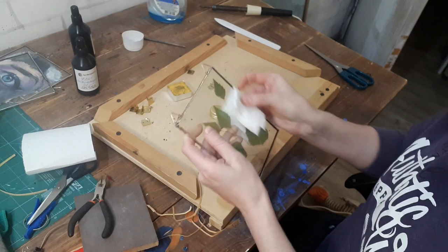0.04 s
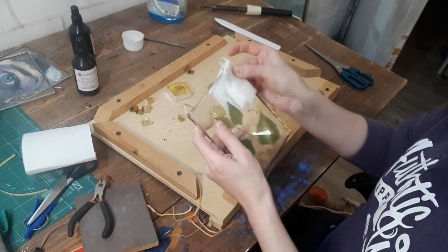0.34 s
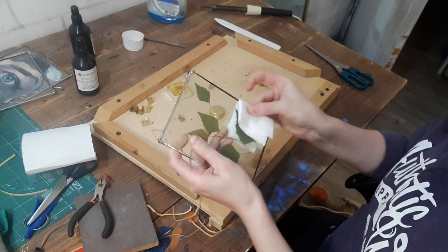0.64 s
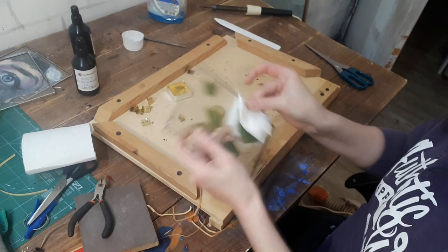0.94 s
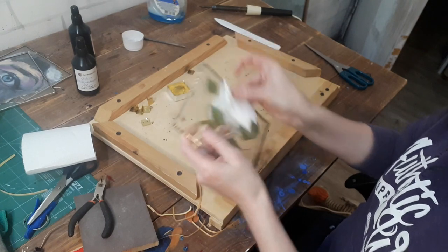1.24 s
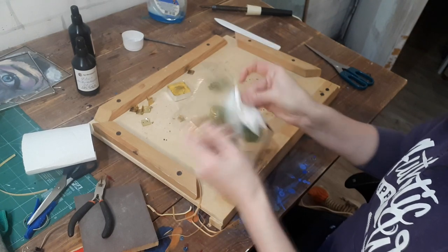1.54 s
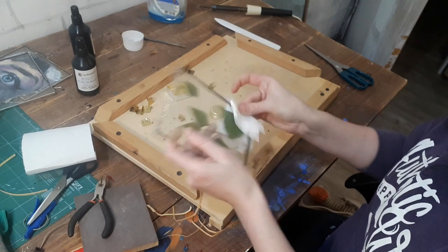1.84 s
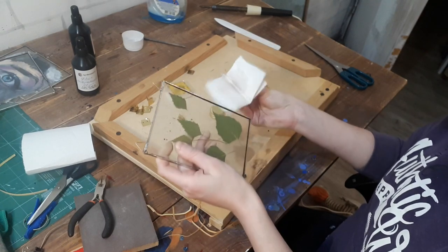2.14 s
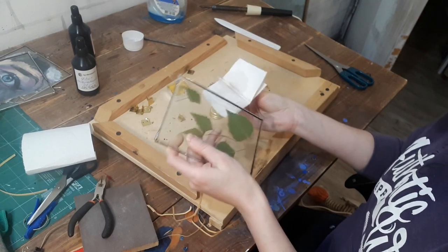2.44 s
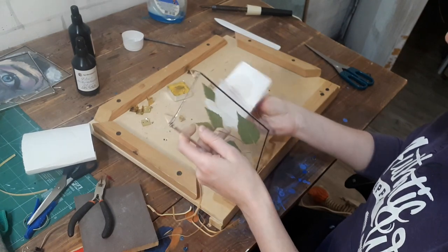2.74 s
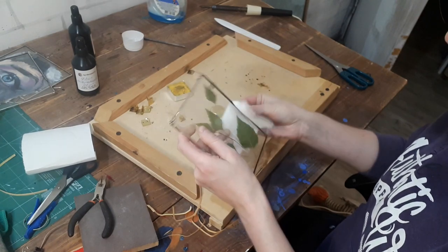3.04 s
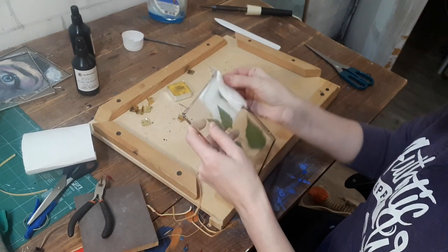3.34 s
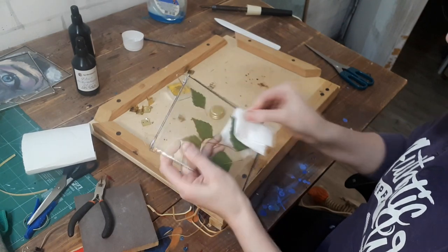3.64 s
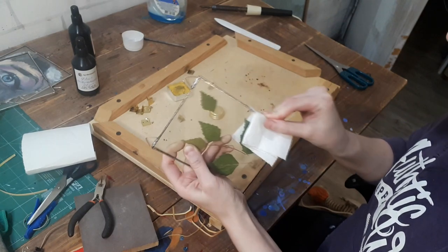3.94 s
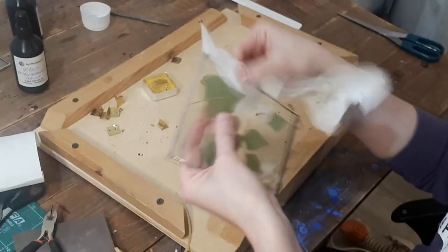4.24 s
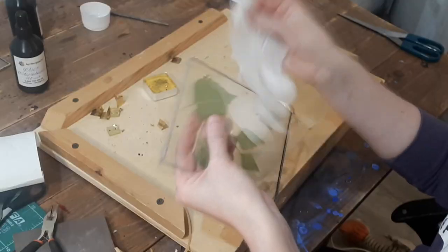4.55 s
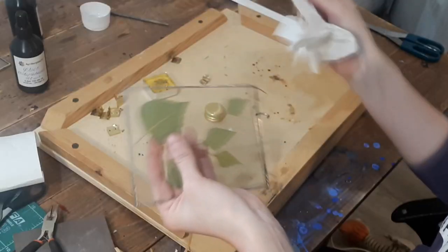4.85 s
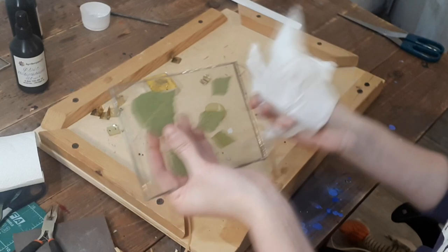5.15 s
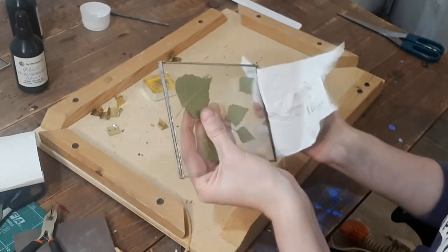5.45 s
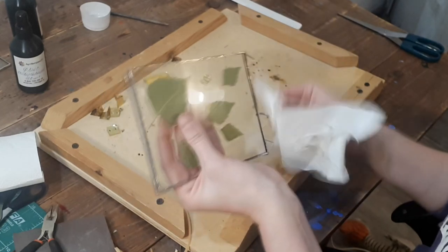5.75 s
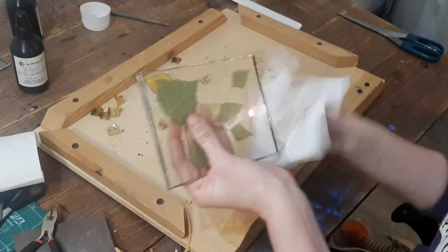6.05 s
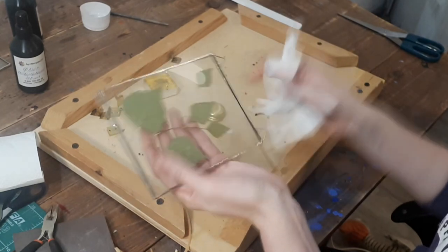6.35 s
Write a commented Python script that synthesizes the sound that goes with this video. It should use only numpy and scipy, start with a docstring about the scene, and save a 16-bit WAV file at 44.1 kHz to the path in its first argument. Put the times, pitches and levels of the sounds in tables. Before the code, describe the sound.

A damp paper napkin wipes glass in quick hissing strokes, then is shaken and refolded, with crisp snaps and light knocks.

```python
"""Wiping glass with a damp napkin

Quick strokes hiss over a hand-held glass panel as the paper's fibres catch and slip. Twice the paper
drags coarsely over the edge, then it is shaken out and refolded. Creases snap, the panel knocks lightly
and there are soft bumps on the wooden work board below. The small room rumbles, and a lamp fizzes at
twice the mains frequency."""
import sys
import numpy as np
from scipy import signal
from scipy.fft import rfft, irfft, next_fast_len
from scipy.io import wavfile
from scipy.ndimage import map_coordinates

SR = 44100
rng = np.random.default_rng(int(sys.argv[2]) if len(sys.argv) > 2 else 0)


def generate_wav(signal):
    """Clip the signal to [-1, 1] and save it as 16-bit WAV at the path in sys.argv[1]."""
    frames = np.transpose(np.atleast_2d(signal))
    scaled = np.clip(frames, -1, 1) * 32767
    pcm = np.round(scaled).astype(np.int16)
    wavfile.write(sys.argv[1], SR, pcm)


N = 290619
TIME = np.arange(N) / SR


def amp(db):
    """Turn decibels into a number to multiply by."""
    return 10 ** (np.asarray(db) / 20)


def unit(x):
    """Scale a sound to an average (rms) size of 1."""
    return x / np.sqrt(np.mean(x ** 2) + 1e-20)


def along(points, hz):
    """Read between (Hz, value) points, with octaves evenly spaced."""
    freqs, values = np.transpose(points)
    return np.interp(np.log(hz + 1), np.log(freqs + 1), values)


def swell(start, rise, hold, db, fall, sag_db=0, curve=1):
    """Loudness of a hand movement: it gathers speed, holds, then dies away by `fall` dB a second."""
    age = TIME - start
    speed = np.clip(age / rise, 0, 1) ** curve
    sag = sag_db * np.clip((age - rise) / hold, 0, 1)
    fade = fall * np.maximum(age - rise - hold, 0)
    return speed * amp(db - sag - fade)


def wobble(rate):
    """A smooth curve through `rate` random values a second."""
    return map_coordinates(rng.standard_normal(int(N * rate / SR) + 4), [TIME * rate])


def filtered(x, response):
    """Multiply each frequency in x by response(hz)."""
    size = next_fast_len(N + SR // 2)
    return irfft(rfft(x, size) * response(np.fft.rfftfreq(size, 1 / SR)), size)[..., :N]


def coloured(x, spectrum):
    """Give x a tone colour from (Hz, dB) points, at an average size of 1."""
    return unit(filtered(x, lambda hz: amp(along(spectrum, hz))))


def add(track, start, sound):
    """Mix a short sound into the track at `start` seconds."""
    part = track[max(round(start * SR), 0):][:len(sound)]
    part += sound[:len(part)]


def slips(rate, spread_db, clump_db, clump_rate):
    """Fibres letting go: about `rate` tiny clicks a second, uneven in size and louder in clumps."""
    fired = rng.random(N) < rate / SR
    sizes = amp(spread_db * rng.standard_normal(N) + clump_db * wobble(clump_rate))
    return fired * sizes * rng.standard_normal(N)


# The rumble's tone colour. Each row: frequency in Hz, relative level in dB.
RUMBLE_COLOUR = [(25, -20), (45, 2.5), (62, -7), (88, 0.5), (155, -0.5), (215, -9), (400, -12), (700, -15),
                 (1200, -17), (2400, -18), (3500, -20.5), (11500, -24.5), (15000, -37)]
# The rumble's loudness. Each row: time in seconds, level in dB.
RUMBLE_LEVEL = [(0, -59.5), (4.18, -59.5), (4.24, -57), (6.59, -56.5)]
# How alike left and right are. Each row: frequency in Hz, likeness from 0 to 1.
RUMBLE_LIKENESS = [(40, 0.43), (100, 0.21), (500, 0.25), (2000, 0), (8000, 0.057)]
# The tones of the hum. Each row: pitch in Hz, typical level in dB.
HUM_TONES = [(48, -93.5), (87.5, -73), (149, -89)]


def room_tone():
    """The room rumbles and hums unsteadily, with a faint, even hiss on top."""
    def mid_and_side(hz):
        """Split the noise into what both sides share and what sets them apart."""
        angle = np.arccos(np.clip(along(RUMBLE_LIKENESS, hz), -1, 1)) / 2
        return np.array([np.cos(angle), np.sin(angle)])

    mid, side = filtered(rng.standard_normal((2, N)), mid_and_side)
    rumble = coloured(np.array([mid + side, mid - side]), RUMBLE_COLOUR)
    hiss = coloured(rng.standard_normal((2, N)), [(6000, -59), (12000, 8), (16000, 4)])
    hum = sum(amp(db + 1.9 * wobble(3.5)) * np.sin(2 * np.pi * hz * TIME + wobble(7.5))
              for hz, db in HUM_TONES)
    level = amp(np.interp(TIME, *np.transpose(RUMBLE_LEVEL)))
    return level * (rumble + amp(-6) * hiss) + hum


# Where the lamp rings. Each row: pitch in Hz, width in Hz, relative level in dB.
LAMP_RINGS = [(12570, 160, 0), (12880, 110, -5)]
# The lamp's loudness on the right. Each row: time in seconds, level in dB.
LAMP_LEVEL = [(0, -61), (4, -64), (5.3, -59.5), (6.6, -60.5)]


def lamp(mains_hz=50, burst_t60=0.052, kick_db=3):
    """The lamp's power supply rings in a short burst on every half cycle of the mains."""
    age = TIME % (1 / (2 * mains_hz))
    kicks = unit(1. * (np.diff(age, prepend=0) < 0))
    # A "t60" is the time in seconds that a sound takes to fade by 60 dB.
    fizz = unit(amp(-60 * age / burst_t60) * rng.standard_normal((2, N)))
    coil = lambda f: sum(amp(db) / (1 + 1j * (f - hz) / width) ** 2 for hz, width, db in LAMP_RINGS)
    whine = unit(filtered(fizz + amp(kick_db) * kicks, coil))
    level = amp(np.interp(TIME, *np.transpose(LAMP_LEVEL)))
    return level * amp([[-8], [0]]) * whine  # quieter on the left


# Wiping strokes. Each row: start, rise and hold in seconds, relative hiss level in dB, sag during the
# hold in dB, fall in dB a second, rough level of the final rasp against the hiss in dB.
STROKES = [ (-0.04, .042, .046, -40.2, 2, 320, -11.6), (0.199, .037, .068, -44, 2.5, 530, -18.5),
           (0.378, .132, .073, -38.1, 4.2, 375, -11.7), (0.874, .096, .122, -41.7, 3.3, 585, -9.8),
           (1.137, .111, .112, -40.4, 4, 450, -12.5), (1.496, .056, .036, -40.3, 3.9, 210, -9.3),
           (1.698, .078, .11, -40.8, 6.8, 180, -13.3), (3.087, .051, .121, -43.3, 7.8, 510, -11),
           (3.433, .052, .101, -39.4, 4.2, 340, -10.3), ]
# The wad catching on the glass. Each row: start in seconds, relative rasp level in dB.
CATCHES = [(1.326, -51), (1.816, -48.5), (3.646, -63.4)]
# Tone colours of the hiss and the rasp. Each row: frequency in Hz, relative level in dB.
HISS_COLOUR = [(300, -32), (900, -28), (1500, -20), (2000, -17.5), (2350, -13), (3000, -2.5), (4200, 0),
               (5200, 0), (7700, 2), (8600, -6), (10500, -3.5), (12500, -4.5), (15800, -11.5)]
RASP_COLOUR = [(500, -24), (1200, -11.5), (1950, -12), (2200, 0.5), (2900, 2), (4000, -8.5), (7000, -30)]


def wiping(rasp_growth_db_per_s=20):
    """The glass gives off the fibre slips well only above 2 kHz; firm pressure adds a lower rasp."""
    hiss = 0
    rasp = sum(swell(start, rise=.012, hold=.012, db=db, fall=260) for start, db in CATCHES)
    for start, rise, hold, db, sag_db, fall, rasp_db in STROKES:
        stroke = swell(start, rise, hold, db, fall, sag_db)
        hiss += stroke
        # The rasp gains on the hiss as the hand bears down and slows.
        time_left = np.maximum(start + rise + hold - TIME, 0)
        rasp += stroke * amp(rasp_db - rasp_growth_db_per_s * time_left)
    fine = coloured(slips(rate=14000, spread_db=2.0, clump_db=0.6, clump_rate=130), HISS_COLOUR)
    coarse = coloured(slips(rate=4000, spread_db=2.0, clump_db=1.4, clump_rate=120), RASP_COLOUR)
    grip = amp(.6 * wobble(35))  # the damp wad grips unevenly
    return grip * (amp(2.5) * hiss * fine + amp(2.0) * rasp * coarse)


# Loose paper grazing the glass. Each row: start, rise and hold in seconds, relative level in dB,
# extra treble in dB.
BRUSHES = [(0.132, .031, .046, -60, -3), (2.85, .12, .028, -49.2, -4), (3.332, .019, .003, -58.4, 0),
           (3.647, .012, .003, -59.8, -2), (5.35, .048, .003, -52, 7), (5.525, .014, .079, -44.6, 1.5)]
# Its tone colour. Each row: frequency in Hz, relative level in dB.
BRUSH_COLOUR = [(500, -19), (2000, -18), (2900, -7.5), (4000, -6), (6000, -2), (7700, -3), (8800, -11),
                (11000, -8), (15800, -15)]


def brushing():
    """A light touch stirs only the finest fibres, so its hiss is thin and high."""
    fibres = coloured(slips(rate=13000, spread_db=4.5, clump_db=1.0, clump_rate=160), BRUSH_COLOUR)
    passes = sum(swell(*movement, fall=270) * coloured(fibres, [(3000, 0), (10000, treble_db)])
                 for *movement, treble_db in BRUSHES)
    return amp(0.5) * passes


def drag(grains, start, rise, hold, db, fall, body_hz=1500, body_db=2.3):
    """The edge bites at once in the treble; the low body builds with tension until the paper lets go."""
    body = filtered(grains, lambda hz: 1 / (1 + (hz / body_hz) ** 4))
    bite = swell(start, rise, hold, db, fall, curve=.62)
    tension = swell(start, rise + hold, hold=.008, db=db + body_db, fall=fall)
    return bite * (grains - body) + tension * body


# The napkin is pulled slowly off the edge, later whipped open across it, and then flaps loosely.
# Each is one row: start, rise and hold in seconds, relative level in dB, fall in dB a second.
PULL = (0.72, .052, .021, -32.7, 630)
WHIP = (4.226, .008, .03, -31, 700)
FLAP = (4.285, .014, .026, -51.2, 370)
# Tone colours of the pull and the whip. Each row: frequency in Hz, relative level in dB.
PULL_COLOUR = [(250, -26), (500, -25), (800, -12), (1100, -12.5), (1600, -11.5), (1900, -2), (3000, -4),
               (4000, -4.5), (5200, -12.5), (7500, -6), (9000, -16.5), (11000, -12.5), (15800, -23)]
WHIP_COLOUR = [(150, -36), (250, -19), (340, -9), (460, -2), (700, -6), (1000, -4.5), (1700, -7.5),
               (2400, 0), (3800, -2.5), (7500, 0), (8900, -6.5), (12500, -4), (15800, -10)]


def edge_drags(jerks_per_s=350):
    """A slow pull over the edge moves in large jerks; a fast whip runs them together."""
    pull = coloured(slips(rate=4500, spread_db=3.0, clump_db=1.0, clump_rate=jerks_per_s), PULL_COLOUR)
    whip = coloured(slips(rate=9000, spread_db=1.5, clump_db=0.9, clump_rate=jerks_per_s), WHIP_COLOUR)
    return drag(pull, *PULL) + drag(whip, *WHIP) + swell(*FLAP) * whip


# Short cracks: creases snapping over the glass, and the sharp start of some strokes. Each row: start in
# seconds, relative level in dB.
SNAPS = [(0.758, -27.5), (0.795, -32), (1.347, -34), (1.535, -38), (1.578, -34.5), (1.827, -26),
         (3.448, -39), (5.535, -41), (6.068, -41)]


def snaps(t60=0.0053):
    """A crease letting go, or a stroke biting in, gives a very short crack."""
    track, t = np.zeros(N), np.arange(SR // 20) / SR
    for start, db in SNAPS:
        add(track, start, amp(db + 0.5 - 60 * t / t60) * rng.standard_normal(len(t)))
    colour = [(300, -8), (1300, -23), (2600, 17), (7000, 3), (15000, -15)]
    return filtered(track, lambda hz: amp(along(colour, hz)))


# Light knocks of the panel. Each row: start in seconds, relative level in dB.
KNOCKS = [(1.827, -52), (2.092, -53), (4.497, -47), (4.639, -44.5), (6.006, -37), (6.069, -39.5)]
# The panel's ringing tones. Each row: pitch in Hz, relative level in dB, seconds to fade by 60 dB.
PANEL_TONES = [(484, 0, 0.049), (590, 3, 0.065), (780, 5.5, 0.013), (1000, -3, 0.09), (1200, -1, .04),
               (1700, -10, 0.043)]


def knocks():
    """The hand damps the panel, so its knocks die at once."""
    track, t = np.zeros(N), np.arange(SR // 5) / SR
    for start, db in KNOCKS:
        for hz, tone_db, t60 in PANEL_TONES:
            peak_db = db - 11 + tone_db + rng.normal(0, 0.87)
            add(track, start, amp(peak_db - 60 * t / t60) * np.sin(2 * np.pi * hz * t))
    return track


# Paper being turned and refolded. Each row: start, rise and hold in seconds, relative level in dB.
RUSTLES = [(2.055, .035, .003, -63), (4.372, .169, .03, -60), (4.591, .095, .08, -67.5),
           (4.83, .05, .05, -65), (5.171, .118, .003, -54.7), (6.029, .039, .003, -47.2),
           (6.107, .06, .013, -56), (6.3, .075, .134, -57.6)]
# Its tone colour. Each row: frequency in Hz, relative level in dB.
RUSTLE_COLOUR = [(150, 4), (400, -2.5), (1000, -1), (1700, -3), (2600, 0.5), (4500, -2), (7500, 4.5),
                 (8800, -2), (12000, -3.5), (15800, -14)]


def rustling():
    """Limp paper crumples softly in the fingers."""
    motion = sum(swell(*movement, fall=210) for movement in RUSTLES)
    crumple = coloured(slips(rate=5000, spread_db=3.0, clump_db=1.3, clump_rate=120), RUSTLE_COLOUR)
    return amp(1.5) * motion * crumple


# Dull bumps against bench and board. Each row: start in seconds, relative level in dB, pitch in Hz.
BUMPS = [(4.094, -51, 84), (4.118, -47, 82.6), (4.164, -54, 86), (4.34, -54, 135), (4.425, -59, 335),
         (4.515, -54, 132), (4.636, -56, 238), (6.074, -50, 145)]


def bumps(t60=0.22, attack_s=.004):
    """A soft contact sets off just one low tone in the wood."""
    track, t = np.zeros(N), np.arange(SR // 3) / SR
    onset = 1 - np.exp(-t / attack_s)
    for start, db, hz in BUMPS:
        add(track, start, onset * amp(db - 60 * t / t60) * np.sin(2 * np.pi * hz * t))
    return track


# How long the walls echo. Each row: frequency in Hz, seconds to fade by 60 dB.
ECHO_TIMES = [(150, 0.47), (1000, 0.22), (4000, 0.24), (8000, 0.19), (15000, 0.06)]


def echoes(x, early_db=-4.5, tail_db=-5.0, early_t60=0.055, size=256):
    """Echoes off bench and walls smear the energy at each frequency into fading noise."""
    hz, t, bands = signal.stft(x, SR, nperseg=size)
    age = t[t < .4]

    def fading(db, t60):
        """Power of echoes that arrive just after the direct sound and die away."""
        power = (age > 0) * amp(-60 * age / t60) ** 2
        return amp(db) ** 2 * power / power.sum(-1, keepdims=True)

    decay = fading(early_db, early_t60) + fading(tail_db, along(ECHO_TIMES, hz)[:, None])
    energy = signal.fftconvolve(np.abs(bands) ** 2, decay, axes=1)[:, :len(t)]
    noise = signal.stft(rng.standard_normal((2, N)), nperseg=size)[2]
    return signal.istft(np.sqrt(np.abs(energy)) * noise / noise.std(), nperseg=size)[1][:, :N]


# The balance between the sides. Each row: frequency in Hz, left level minus right level in dB.
LEFT_BIAS = [(200, 0.5), (2000, 0.1), (3300, 2.3), (5800, 1), (7500, 1.5), (8500, -3.5), (10000, -1),
             (15000, -1.5)]


def room(x, direct_db=-6, left_lead_s=.00006):
    """The sound reaches the left first and echoes follow; each side colours the treble its own way."""
    sides = np.array([[.5], [-.5]])
    direct = filtered(x, lambda hz: np.exp(2j * np.pi * hz * left_lead_s * sides))
    return filtered(amp(direct_db) * direct + echoes(x), lambda hz: amp(sides * along(LEFT_BIAS, hz)))


def scene():
    """Napkin and glass echo in the room; bumps, lamp and rumble are added without echo."""
    paper = amp(3.0) * (wiping() + brushing() + rustling())
    handling = paper + edge_drags() + snaps() + knocks()
    return room(handling) + bumps() + lamp() + room_tone()


def record(dry, top_hz=15850):
    """Thin out the deepest bass and cut off the very highest treble."""
    thinned = filtered(dry, lambda hz: amp(along([(25, -17), (42, -0.5)], hz)))
    return filtered(thinned, lambda hz: hz < top_hz)


dry = scene()
out = record(dry)
generate_wav(out)
```